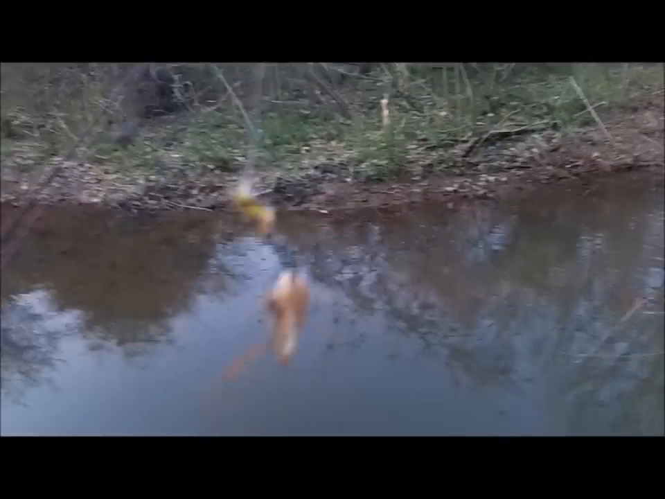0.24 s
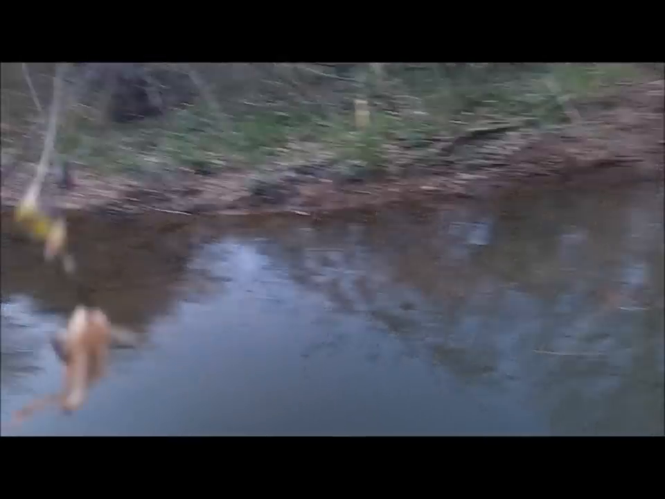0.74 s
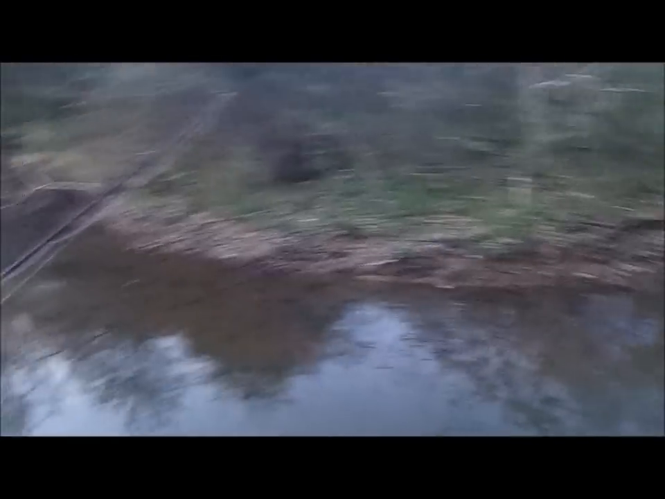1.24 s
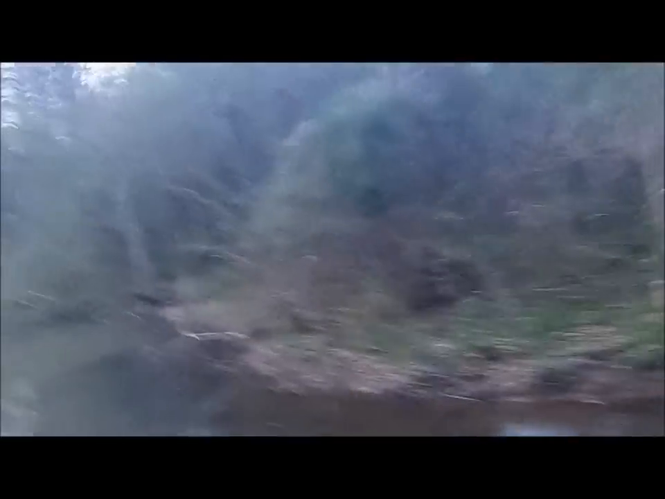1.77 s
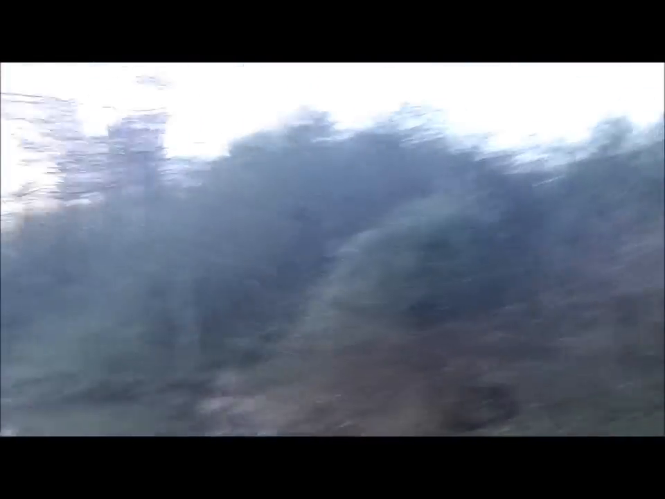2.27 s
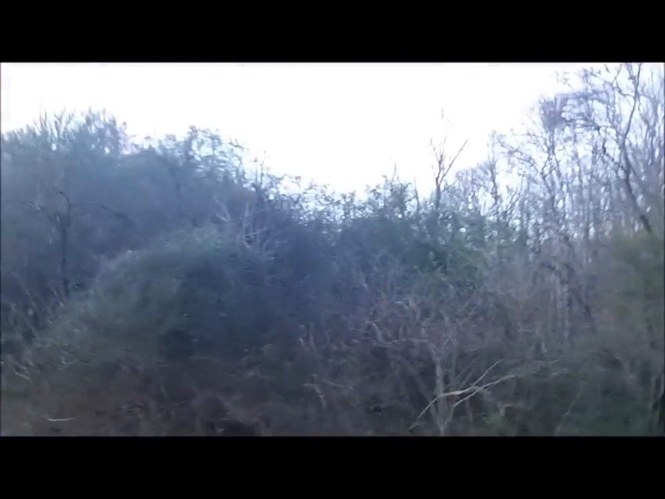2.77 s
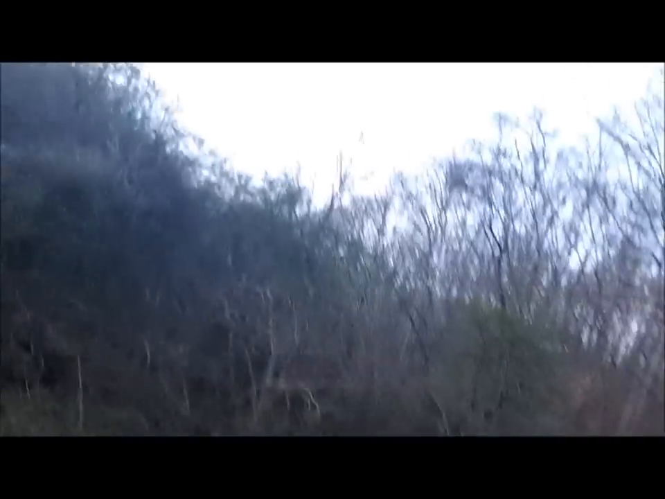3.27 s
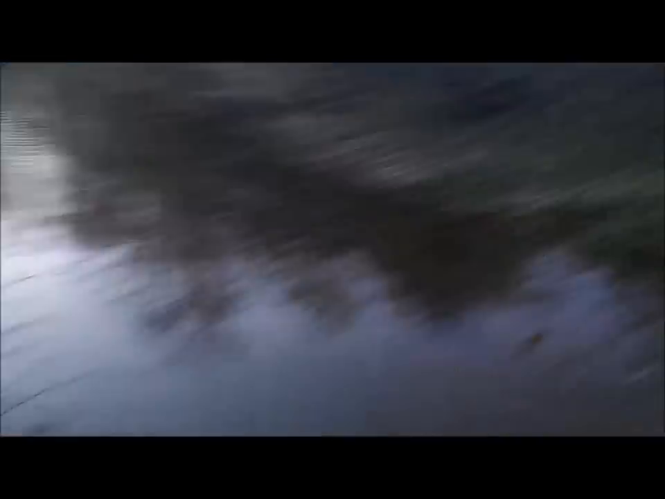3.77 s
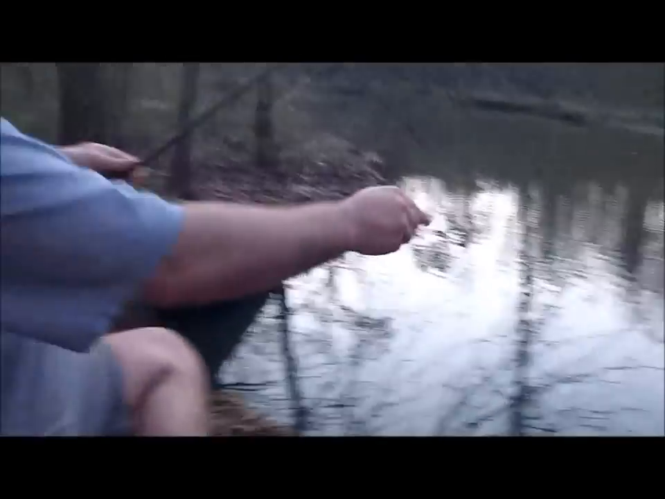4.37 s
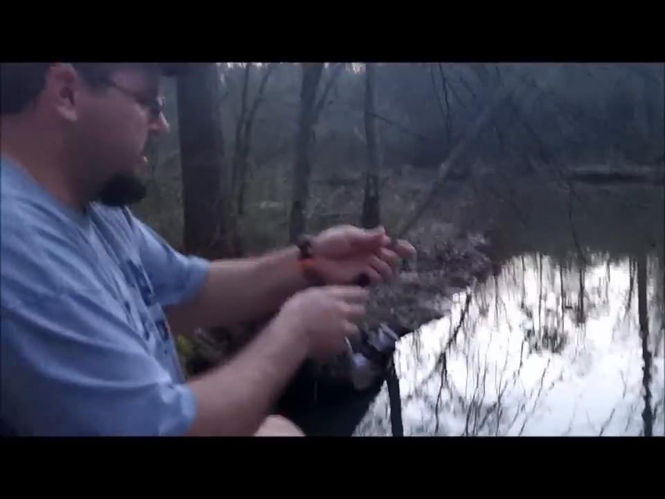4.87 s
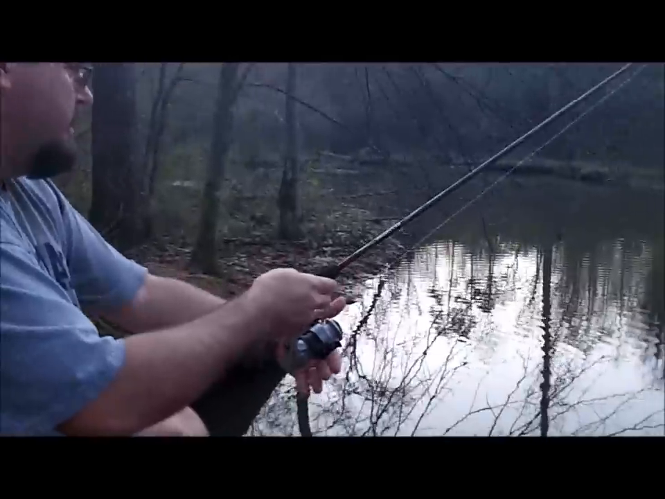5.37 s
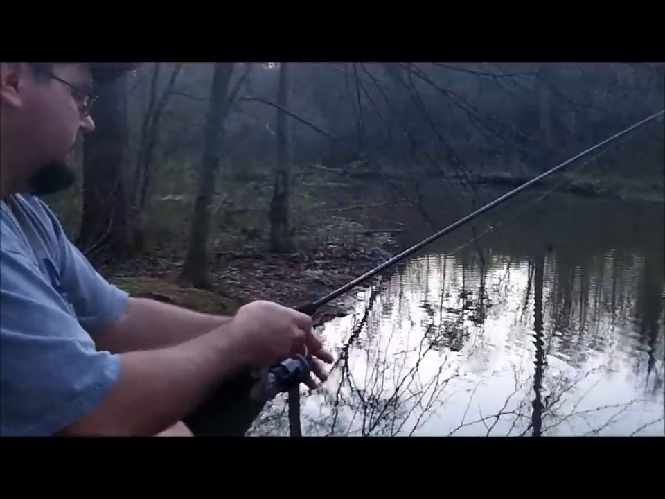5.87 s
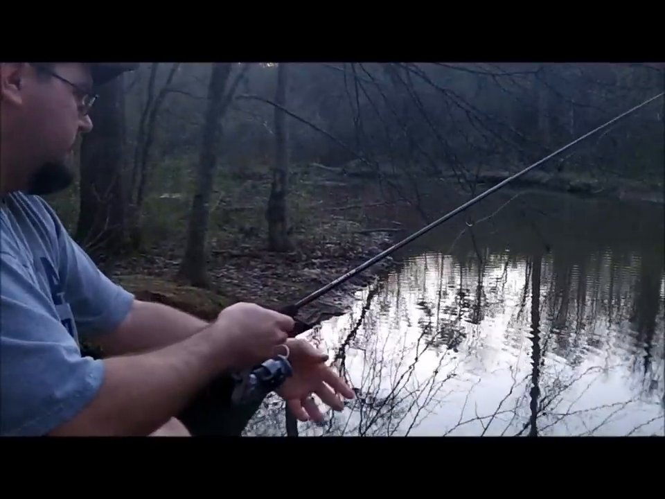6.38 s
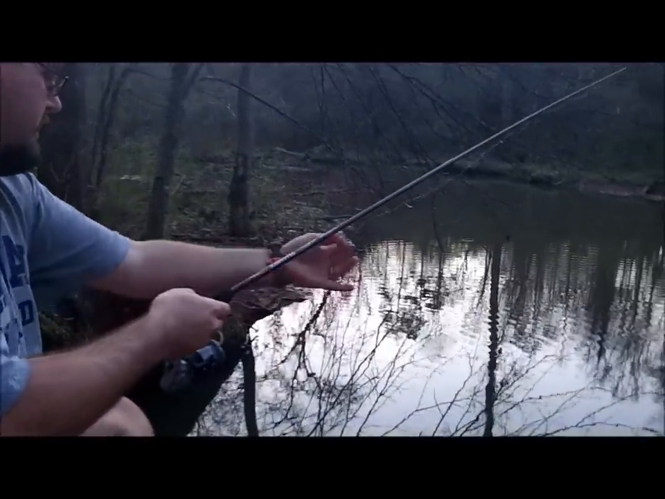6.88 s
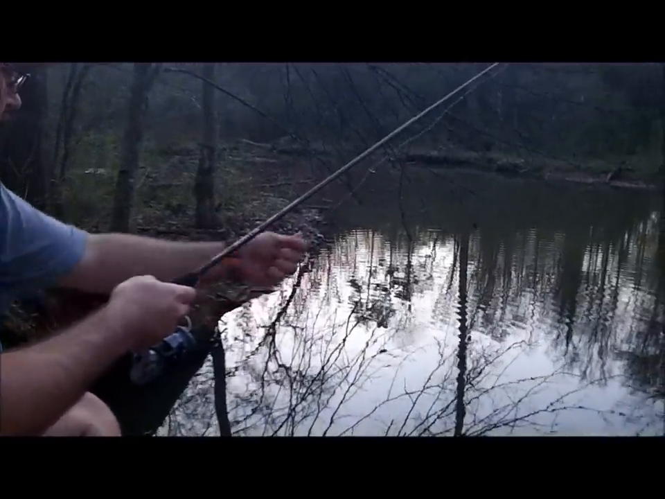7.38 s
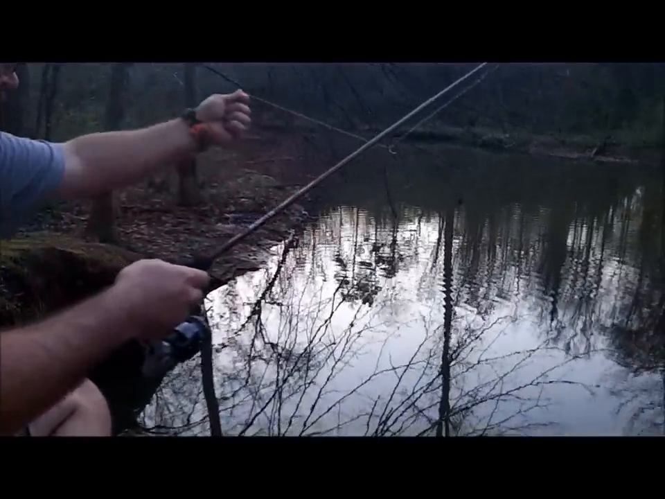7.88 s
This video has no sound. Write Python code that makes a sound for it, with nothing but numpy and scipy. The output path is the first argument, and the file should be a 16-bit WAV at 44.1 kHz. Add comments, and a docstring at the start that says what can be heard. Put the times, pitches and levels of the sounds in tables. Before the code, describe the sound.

A dense chorus of small frogs peeps shrilly beside a wooded creek, with light rustles, microphone bumps and faint fishing tackle ticks.

```python
"""Spring peepers in a dense dusk chorus by a wooded creek, through a small hand-held camera.
Each peep is a rising whistle carried by the vocal sac. A few near frogs stand out of a far crowd,
all scattered by the trees. Sleeves rustle, the camera is gripped, bumped and swung, and fishing
tackle ticks over quiet outdoor noise and a faint hum."""
import sys
import numpy as np
from scipy import signal
from scipy.fft import rfft, irfft
from scipy.io import wavfile

SR = 44100
rng = np.random.default_rng(int(sys.argv[2]) if len(sys.argv) > 2 else 0)


def wrap_up_sound(samples):
    """Save the sound to the file named by the first command line argument, as 16-bit audio."""
    columns = np.atleast_2d(samples).T
    # keep every value between -1 and 1, then stretch to whole-number steps
    tamed = np.clip(columns, -1, 1)
    steps = np.round(tamed * 32767).astype(np.int16)
    wavfile.write(sys.argv[1], SR, steps)


N = 358091


def undb(db):
    """Decibels to gain."""
    return 10 ** (np.asarray(db) / 20)


def level(x, db):
    """Set the rms level."""
    return x * undb(db) / np.sqrt(np.mean(x ** 2) + 1e-18)


def add(out, start_s, x):
    """Mix x in at start_s, cropped to the scene."""
    i = int(start_s * SR)
    lo, hi = max(i, 0), min(i + len(x), N)
    if hi > lo:
        out[lo:hi] += x[lo - i:hi - i]


def walk(n, rate_hz):
    """Gaussian points at rate_hz, joined by lines."""
    points = rng.standard_normal(4096)
    return np.interp(np.arange(n) * rate_hz / SR, np.arange(len(points)), points)


def band(x, hz, width_hz):
    """One resonance applied twice, for steep skirts."""
    b, a = signal.iirpeak(hz, hz / width_hz, fs=SR)
    return signal.lfilter(b, a, signal.lfilter(b, a, x))


def lowpass(x, corner_hz, order=1):
    """Maximally flat low-pass."""
    return signal.sosfilt(signal.butter(order, corner_hz, fs=SR, output="sos"), x)


def peep(length_s, start_hz, end_hz, bend, sac_width_hz=480):
    """Pitch climbs as the vocal sac tightens; bend > 0 arches, bend < 0 flicks up at the end."""
    # vocal-fold partials, the sac favouring the second: (harmonic, level [dB])
    partials = [(1, -36.5), (2, 0), (3, -33.5)]
    u = np.linspace(0, 1, int(length_s * SR))
    waver = 1 + .0028 * walk(len(u), 125)
    hz = (start_hz + (end_hz - start_hz) * (u + bend * u * (1 - u))) * waver
    fold_phase = 2 * np.pi * (np.cumsum(hz / 2) / SR + rng.random())  # an octave under the whistle
    effort = np.sin(np.pi / 2 * np.clip(np.minimum(u, 1 - u) / .25, 0, 1))
    sac_gain = 1 / (1 + (2 * (hz - hz.mean()) / sac_width_hz) ** 2)  # peaks mid-glide
    return effort * sac_gain * sum(undb(db) * np.sin(k * fold_phase) for k, db in partials)


def calls(rows, length_s, climb_hz_per_s, bend, scatter=.1):
    """Peeps at (time [s], mid pitch [Hz], level [dB]); length and climb vary per call."""
    out = np.zeros(N)
    for s, hz, db in rows:
        longer, steeper = 1 + scatter * rng.standard_normal(2)
        half_rise_hz = climb_hz_per_s * steeper * length_s * longer / 2
        add(out, s, undb(db) * peep(length_s * longer, hz - half_rise_hz, hz + half_rise_hz, bend))
    return out


def leaves(x):
    """A long path through undergrowth loses the upper partial."""
    return lowpass(x, 4500, order=4)


def woods(x, wet_db, t60_s=.65, build_s=.064):
    """Direct sound plus a duller tail of echoes from trunks and banks."""
    t = np.arange(SR) / SR
    echoes = rng.standard_normal(SR) * (rng.random(SR) < .02)
    response = echoes * undb(-60 * t / t60_s) * (1 - np.exp(-t / build_s))
    wrapped = np.r_[x[-SR:], x]  # tail already rings at the start
    tail = signal.fftconvolve(wrapped, response / np.linalg.norm(response))[SR:SR + N]
    return x + undb(wet_db) * leaves(tail)


def crowd(count, centre_hz, spread_hz, rise_hz, length_s, period_s=.73, scatter_db=2, off_pitch_db=-.1):
    """Each frog repeats its own peep at its own pace and distance; body size sets the pitch."""
    out = np.zeros(N)
    sizes = np.arctanh(.98 * np.linspace(-1, 1, count))  # mostly middling
    for size in sizes / np.std(sizes):
        hz = centre_hz + spread_hz * size
        stretch, slowness, nearness, offset = rng.uniform(-.9, 1, 4)
        call = peep(length_s * (1 + .284 * stretch), hz - rise_hz / 2, hz + rise_hz / 2, bend=-.2255)
        for k, (late, strength) in enumerate(rng.standard_normal((18, 2))):
            beat = k - 2 + offset + .08 * late
            db = scatter_db * (nearness + strength) / 2 + off_pitch_db * abs(size)
            add(out, beat * period_s * (1 + .2 * slowness), call * undb(db))
    return out


def distant_frogs():
    """A few mid-distance frogs and a far crowd swell and ease together behind the trees."""
    # crowd swell: (time [s], gain [dB])
    swell = [(0, -18.5), (.73, -19), (1.1, -19), (1.6, -18.5), (3.36, -19.5), (3.6, -19), (3.95, -20.5),
             (4.3, -18), (4.55, -20.5), (4.92, -20), (5.35, -19), (5.6, -19.5), (6.89, -20.2), (7.1, -21),
             (7.55, -18), (8.12, -20)]
    middle = crowd(count=7, centre_hz=2895, spread_hz=75, rise_hz=280, length_s=.11)
    middle = woods(middle, wet_db=-6)
    far = crowd(count=44, centre_hz=2940, spread_hz=102, rise_hz=350, length_s=.118)
    far = woods(leaves(far), wet_db=3)
    swell_db = np.interp(np.arange(N) / SR, *np.transpose(swell))
    return undb(swell_db) * (level(middle, -8) + level(far, -2))


def small_frog(pitch_hz=3395):
    """One small frog: a short, high, arching peep."""
    # calls: (time [s], level [dB])
    high_peeps = [(0, -31.5), (1.375, -30.5), (1.612, -38), (2.337, -35), (3.43, -37), (4.347, -29.5),
                  (5.115, -27.5), (6.177, -29.5), (7.03, -30), (7.82, -29.5)]
    rows = [(s, pitch_hz, db) for s, db in high_peeps]
    return woods(calls(rows, length_s=.07, climb_hz_per_s=4600, bend=.5), wet_db=-7)


def rub(length_s, hz, width_hz, db, grain_db=4, grain_rate_hz=260):
    """Friction: a swell of tiny uneven slips."""
    n = int(length_s * SR)
    slips = rng.standard_normal(n) * undb(grain_db * walk(n, grain_rate_hz))
    return level(band(slips, hz, width_hz) * np.sin(np.linspace(0, np.pi, n)), db)


def rustles(muffle_hz=5000):
    """Cloth and line rub, and fingers slide on the camera; cloth softens both."""
    # cloth and line: (time [s], length [s], centre [Hz], width [Hz], unmuffled level [dB])
    cloth_rubs = [(0, 0.064, 1830, 2060, -41), (.8, 0.046, 1660, 2480, -38.5),
                  (1.0, 0.2, 2350, 2520, -40.5), (1.217, .15, 3160, 2170, -28.5),
                  (1.5, .15, 2370, 1310, -35.5), (1.66, 0.18, 2250, 1610, -31),
                  (1.866, .15, 2480, 2060, -32.5), (3.57, 0.06, 4970, 9000, -41),
                  (3.753, 0.077, 2420, 2570, -28.5), (4.19, .12, 1390, 2130, -37.5),
                  (4.672, .25, 575, 395, -49), (5.116, 0.075, 1820, 2020, -42.5),
                  (6.892, 0.2, 4260, 500, -42)]
    # fingers sliding on the camera: (time [s], length [s], unmuffled level [dB])
    grips = [(1.217, 0.13, -39.5), (1.862, 0.18, -44), (3.748, 0.086, -39.5)]
    # low rumble, case ring near 900 Hz and thin high hiss: (centre [Hz], width [Hz], gain [dB])
    grip_bands = [(50, 100, -6), (218, 270, -5), (900, 410, -4.5), (10300, 4500, -2.5)]
    out = np.zeros(N)
    for s, length_s, hz, width_hz, db in cloth_rubs:
        add(out, s, rub(length_s, hz, width_hz, db))
    for s, length_s, db in grips:
        for hz, width_hz, band_db in grip_bands:
            add(out, s, rub(length_s, hz, width_hz, db + band_db))
    return lowpass(out, muffle_hz)


def air(rms_db=-41, flicker_db=.9, fade_db=2, split_hz=4000):
    """Broad outdoor noise: the lower band flickers and slowly fades, the hiss holds steady."""
    # far air, creek and microphone hiss: (frequency [Hz], relative density [dB])
    spectrum = [(26, 1.5), (91, -6.5), (172, -6.5), (250, -4), (360, -6), (520, -2), (900, -2),
                (1250, -4.5), (2200, -1.7), (3800, -5), (4400, -9), (5100, -13.5), (6800, -16.5),
                (9500, -18.5), (15000, -20.5)]
    hz, db = np.transpose(spectrum)
    bin_hz = np.arange(N // 2 + 1) * SR / N
    shape = undb(np.interp(np.log(bin_hz + 1), np.log(hz), db))
    noise = irfft(rfft(rng.standard_normal(N)) * shape, N)
    low = lowpass(noise, split_hz)
    hiss = noise - low
    low_db = flicker_db * walk(N, 7.9) + fade_db * np.linspace(.5, -.5, N)
    return level(low * undb(low_db) + hiss, rms_db)


def hum(low_hz=64, high_hz=124, waver_hz=1.1):
    """Two faint, wavering low tones."""
    # hum envelopes: (time [s], low tone level [dB], high tone level [dB])
    envelopes = [(0, -70, -50.5), (.4, -67, -56.5), (.6, -65, -59.5), (4, -57, -61), (5.5, -61.5, -67),
                 (8.1, -55, -61)]
    s, low_db, high_db = np.transpose(envelopes)
    out = np.zeros(N)
    for hz, db in ((low_hz, low_db), (high_hz, high_db)):
        phase = 2 * np.pi * np.cumsum(hz + waver_hz * walk(N, 8.8)) / SR
        out += level(np.sin(phase), np.interp(np.arange(N) / SR, s, db))
    return out


def near_frogs(level_db=-18, scatter_db=.8):
    """Close frogs: clear peeps, mostly direct sound."""
    # calls: (time [s], mid pitch [Hz])
    near_peeps = [(.04, 3100), (.24, 2960), (.38, 3040), (.59, 2870), (.66, 3060), (.84, 3070),
                  (1.44, 2850), (1.58, 3050), (1.84, 2830), (1.95, 2900), (2.08, 2980), (2.17, 2890),
                  (2.27, 3040), (2.48, 3010), (2.55, 3070), (2.66, 2970), (2.79, 3040), (2.98, 2840),
                  (3.13, 3080), (3.2, 2980), (3.36, 3020), (3.68, 3040), (3.75, 2830), (3.85, 3010),
                  (3.94, 3050), (4.44, 2990), (4.52, 2850), (4.64, 2980), (4.73, 3090), (4.99, 3020),
                  (5.13, 3010), (5.43, 2810), (5.5, 3110), (5.71, 3010), (5.82, 3040), (5.89, 3050),
                  (6.15, 2830), (6.21, 3090), (6.41, 2990), (6.66, 3010), (6.77, 2850), (6.83, 3080),
                  (7.23, 3030), (7.33, 2820), (7.39, 3080), (7.47, 3020), (7.91, 3030), (8.01, 3060)]
    rows = [(s, hz, level_db + scatter_db * rng.standard_normal()) for s, hz in near_peeps]
    return woods(calls(rows, length_s=.115, climb_hz_per_s=2900, bend=-.25), wet_db=-7.5)


def knock(hz, t60_s, crack_db=-8, crack_t60_s=.059, attack_s=.00017):
    """A contact rings one damped mode, with a short crack of noise around it."""
    t = np.arange(SR // 4) / SR
    ring = np.sin(2 * np.pi * hz * t) * undb(-60 * t / t60_s)
    noise = band(rng.standard_normal(len(t)), hz, width_hz=hz)
    crack = level(noise, crack_db) * undb(-60 * t / crack_t60_s)
    return (ring + crack) * (1 - np.exp(-t / attack_s))


def tackle(ring_cycles=31, gain_db=-2):
    """Fishing tackle ticks; the higher the pitch, the shorter the ring."""
    # ticks: (time [s], pitch [Hz], relative level [dB])
    ticks = [(0.486, 960, -22.5), (3.843, 1005, -26), (3.842, 3180, -25), (4.125, 940, -28.5),
             (5.772, 1740, -25), (5.772, 4960, -29), (5.905, 4800, -37), (5.963, 4800, -37)]
    out = np.zeros(N)
    for s, hz, db in ticks:
        add(out, s, undb(db) * knock(hz, ring_cycles / hz))
    return undb(gain_db) * out


def camera_bumps(thump_t60_s=.028, gain_db=-2):
    """Each bump thumps the camera and clacks its case."""
    # bumps: (time [s], thump pitch [Hz], relative thump level [dB], relative clack level [dB])
    bumps = [(.819, 219, -32.5, -35), (1.279, 190, -24, -38), (1.361, 151, -24, -37), (1.701, 55, -31, -42),
             (1.826, 130, -25.5, -31), (1.908, 260, -26.5, -30), (1.945, 139, -30, -33),
             (1.959, 110, -30, -25.5), (2.024, 71, -24, -26.5), (3.671, 76, -15, -24), (3.69, 90, -33, -29),
             (5.132, 132, -30, -38)]
    # clack modes: (frequency [Hz], t60 [s], gain [dB])
    clack_modes = [(855, 0.017, 2.5), (1670, 0.0086, -3)]
    out = np.zeros(N)
    for s, thump_hz, thump_db, clack_db in bumps:
        add(out, s, undb(thump_db) * knock(thump_hz, thump_t60_s))
        for hz, t60_s, mode_db in clack_modes:
            add(out, s, undb(clack_db + mode_db) * knock(hz, t60_s))
    return undb(gain_db) * out


def camera_swings(centre_hz=38, width_hz=90, gust_db=3):
    """Air buffets the swinging camera: a low, uneven rumble."""
    # swings: (time [s], length [s], rms level [dB])
    swings = [(0.997, 0.53, -51), (1.601, .5, -47.5), (3.599, .35, -48.5)]
    out = np.zeros(N)
    for s, length_s, db in swings:
        n = int(length_s * SR)
        rumble = band(rng.standard_normal(SR), centre_hz, width_hz)[-n:]
        gusts = undb(gust_db * walk(n, 20))
        add(out, s, level(rumble * gusts * np.sin(np.linspace(0, np.pi, n)), db))
    return out


def big_frogs():
    """Big frogs: low, slow peeps with a stronger echo from the trees."""
    # calls: (time [s], mid pitch [Hz], level [dB])
    low_peeps = [(2.53, 2410, -41), (3.222, 2530, -36), (3.365, 2500, -36), (4.05, 2580, -30),
                 (4.78, 2580, -33), (5.095, 2420, -37), (5.32, 2620, -29), (6.0, 2420, -40)]
    return woods(calls(low_peeps, length_s=.15, climb_hz_per_s=1200, bend=0), wet_db=-3)


def scene():
    """Frogs, handling and background at one microphone."""
    frogs = distant_frogs() + small_frog() + near_frogs() + big_frogs()
    handling = rustles() + tackle() + camera_bumps() + camera_swings()
    return (frogs + handling + air() + hum())[None]


def record(dry, dip_hz=7837, dip_width_hz=1640, top_hz=15300):
    """Camera response: a narrow treble dip and a steep top cut."""
    b, a = signal.iirnotch(dip_hz, dip_hz / dip_width_hz, fs=SR)
    dipped = signal.lfilter(b, a, signal.lfilter(b, a, dry))
    return signal.sosfilt(signal.ellip(10, .2, 80, top_hz, fs=SR, output="sos"), dipped)


dry = scene()
out = record(dry)
wrap_up_sound(out)
```